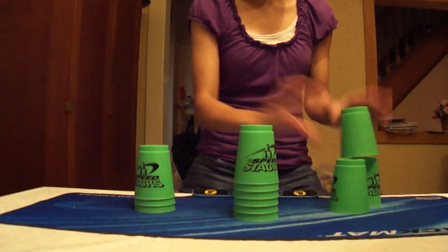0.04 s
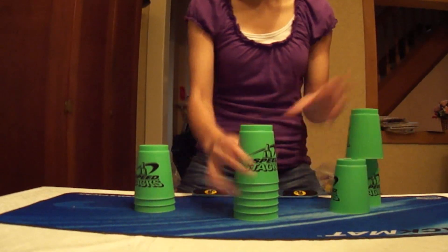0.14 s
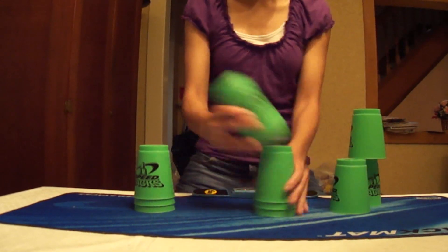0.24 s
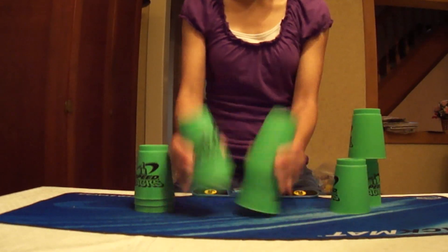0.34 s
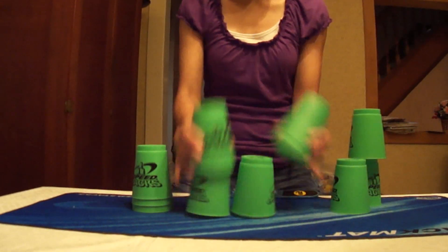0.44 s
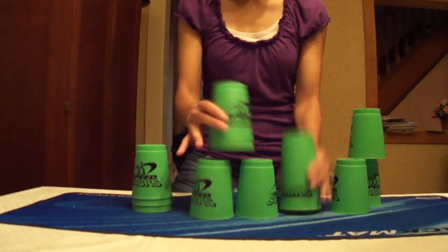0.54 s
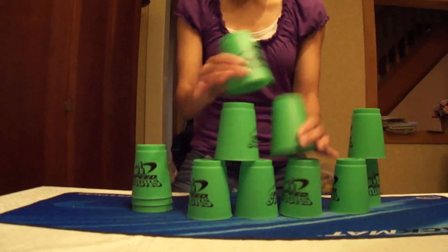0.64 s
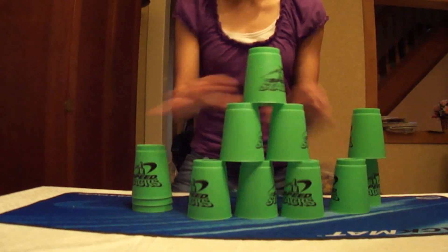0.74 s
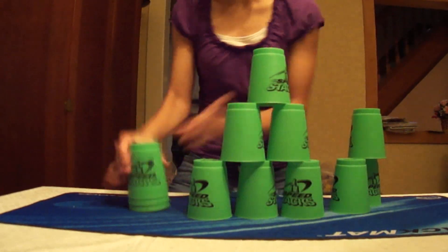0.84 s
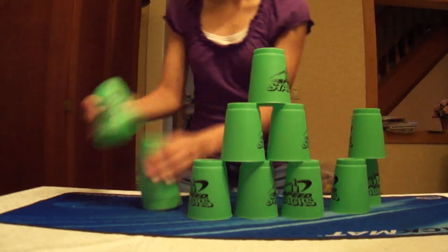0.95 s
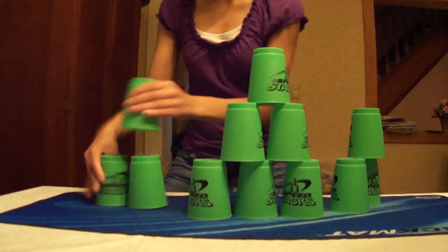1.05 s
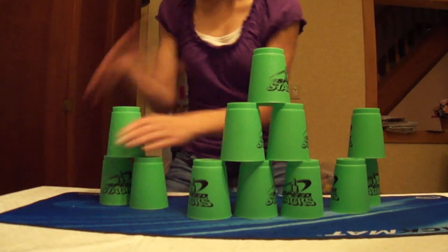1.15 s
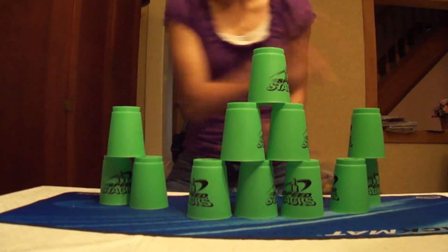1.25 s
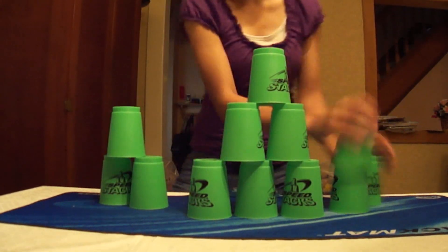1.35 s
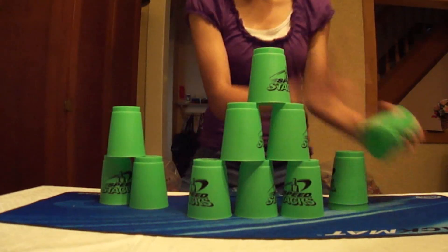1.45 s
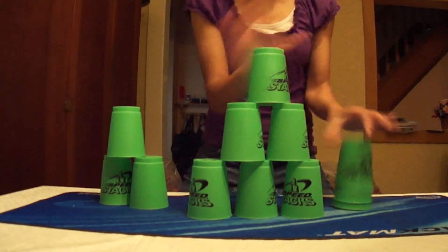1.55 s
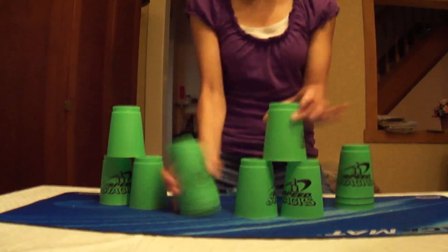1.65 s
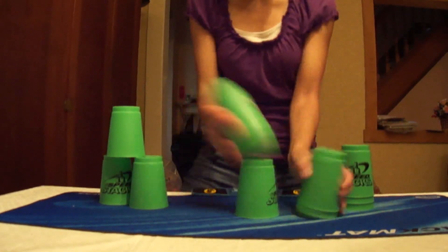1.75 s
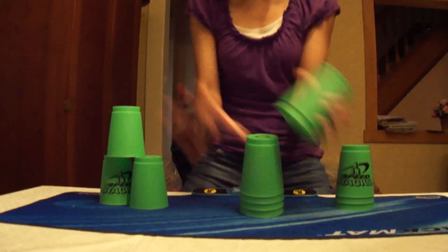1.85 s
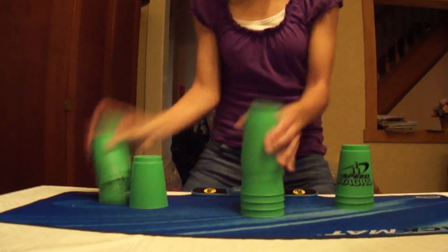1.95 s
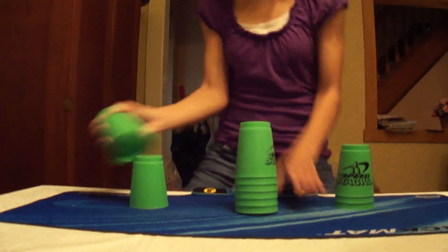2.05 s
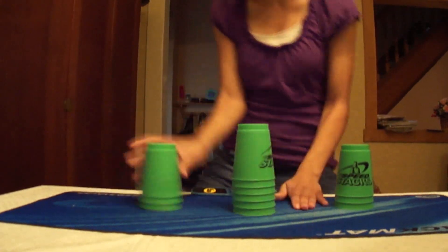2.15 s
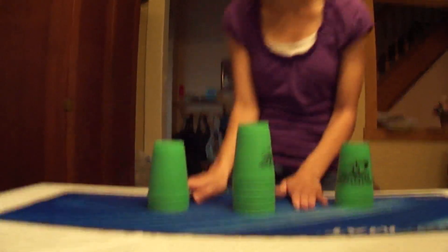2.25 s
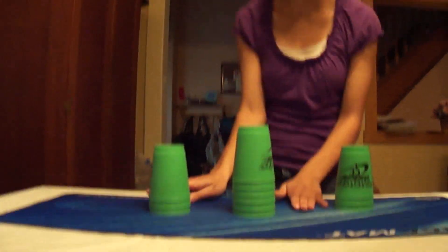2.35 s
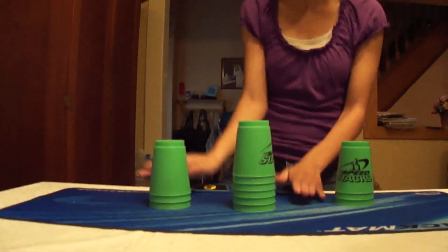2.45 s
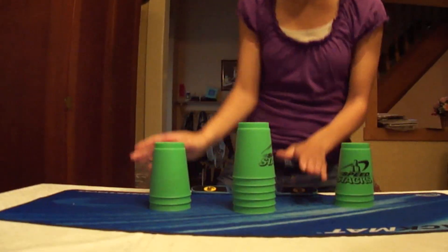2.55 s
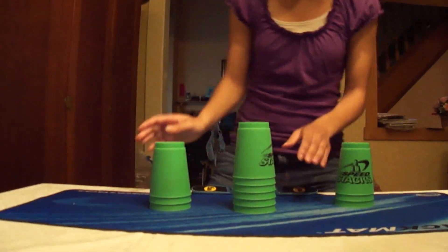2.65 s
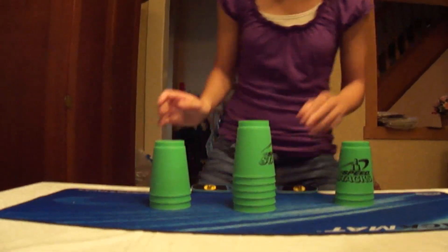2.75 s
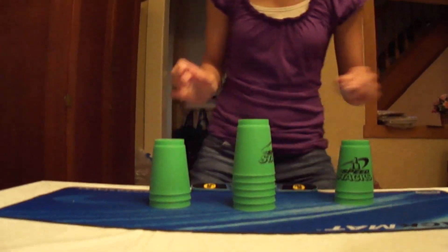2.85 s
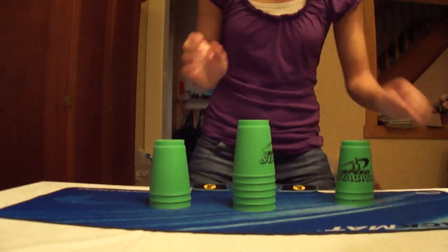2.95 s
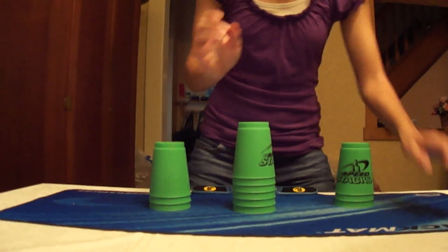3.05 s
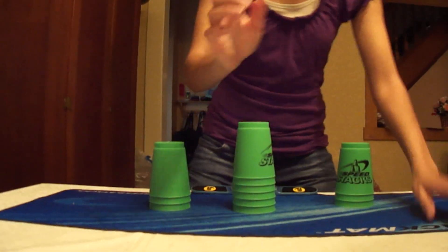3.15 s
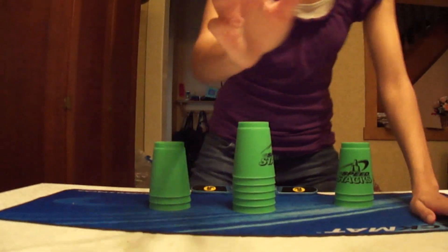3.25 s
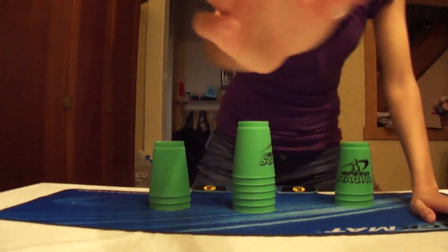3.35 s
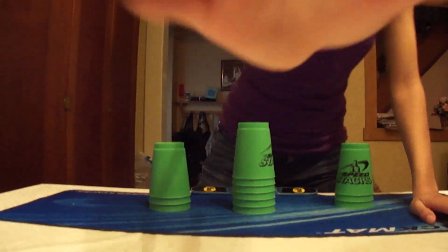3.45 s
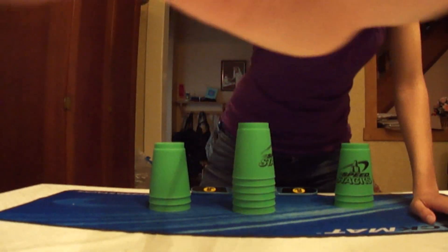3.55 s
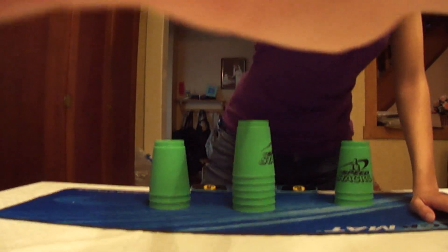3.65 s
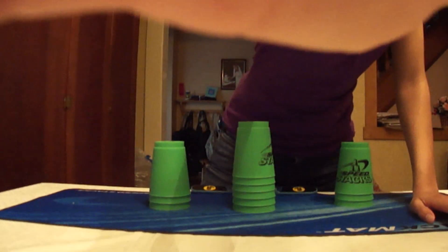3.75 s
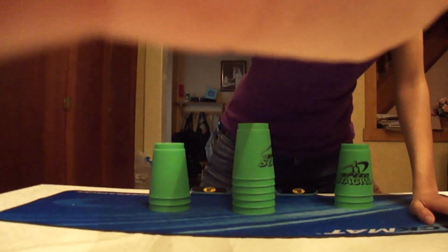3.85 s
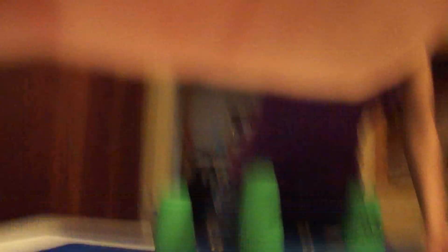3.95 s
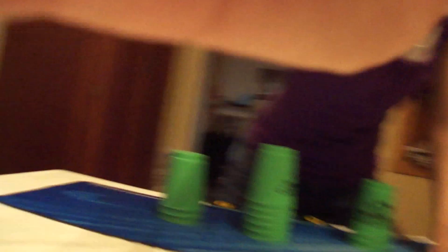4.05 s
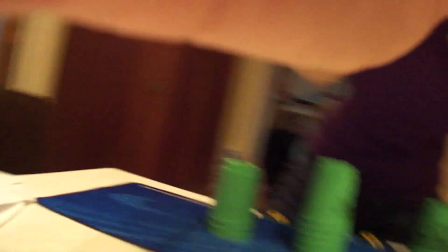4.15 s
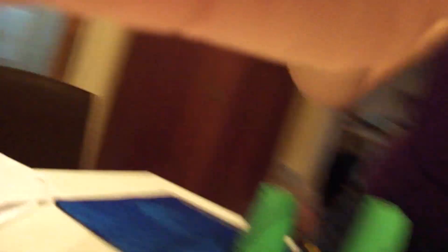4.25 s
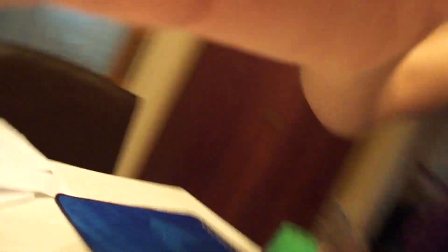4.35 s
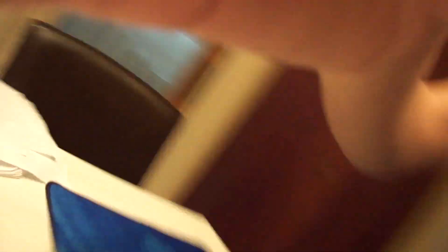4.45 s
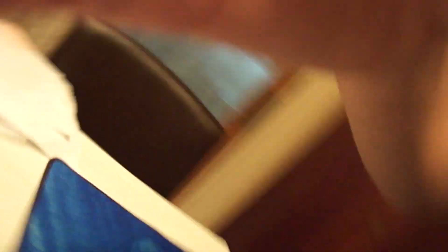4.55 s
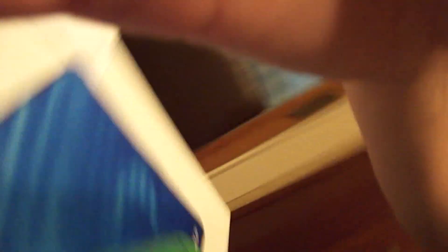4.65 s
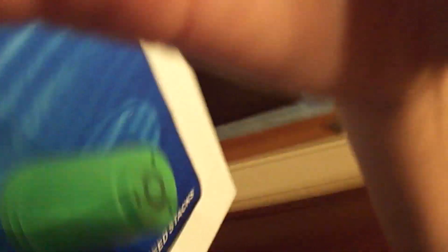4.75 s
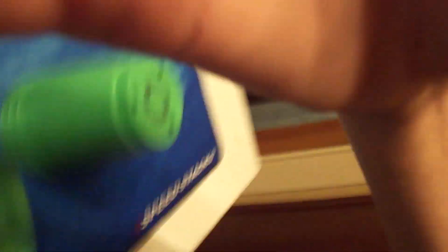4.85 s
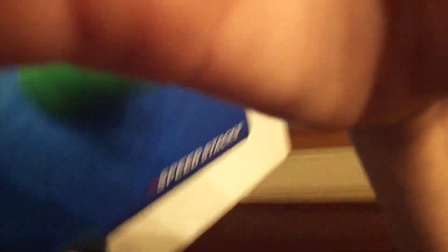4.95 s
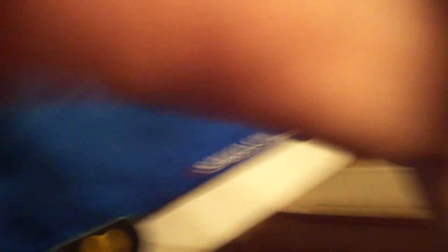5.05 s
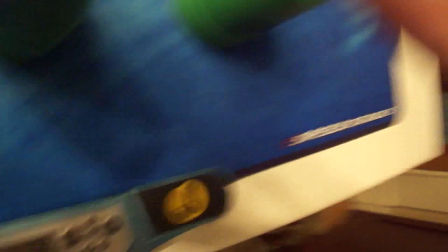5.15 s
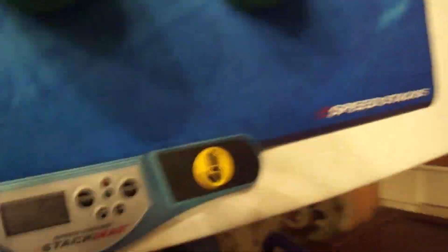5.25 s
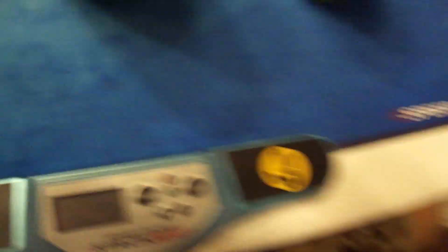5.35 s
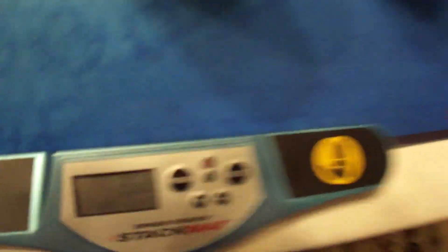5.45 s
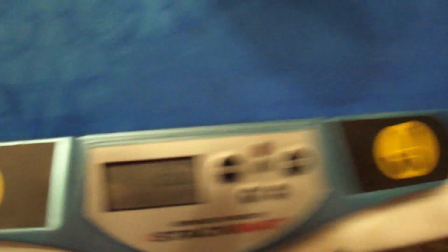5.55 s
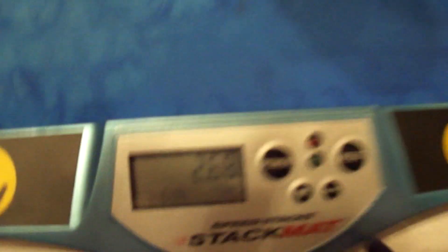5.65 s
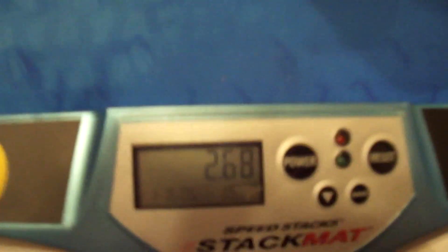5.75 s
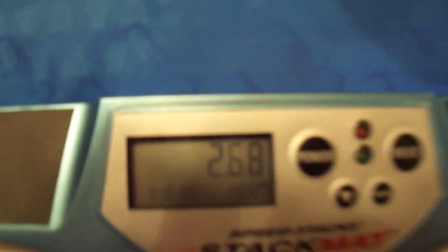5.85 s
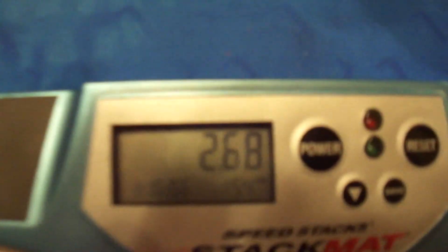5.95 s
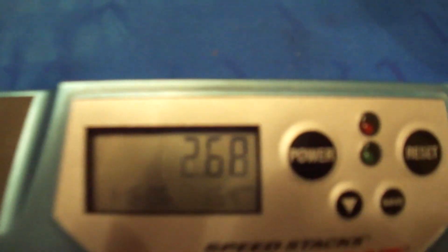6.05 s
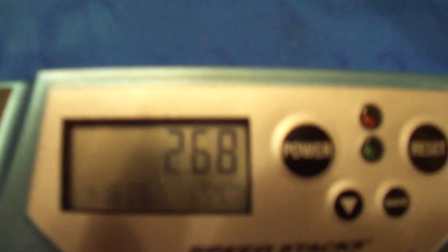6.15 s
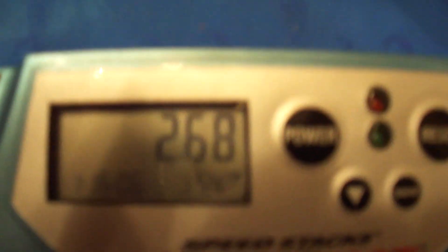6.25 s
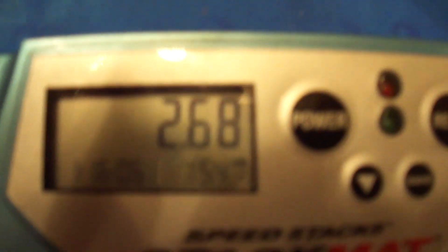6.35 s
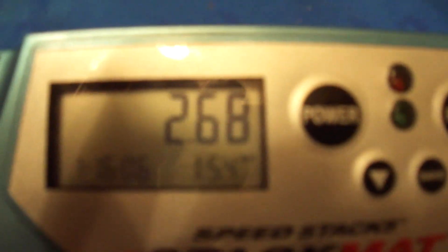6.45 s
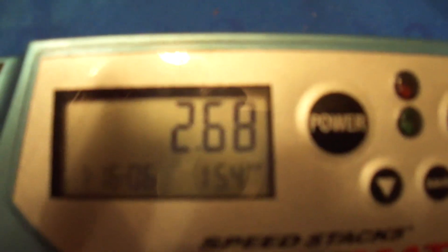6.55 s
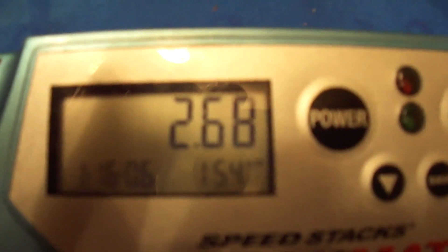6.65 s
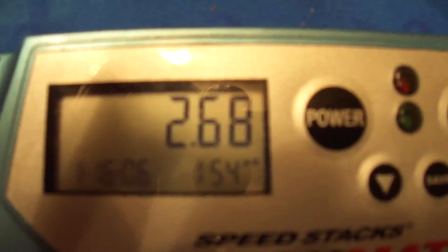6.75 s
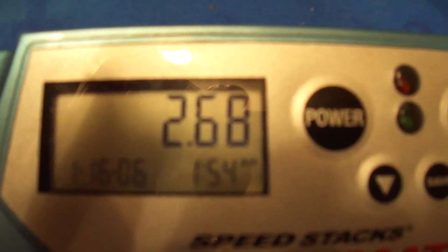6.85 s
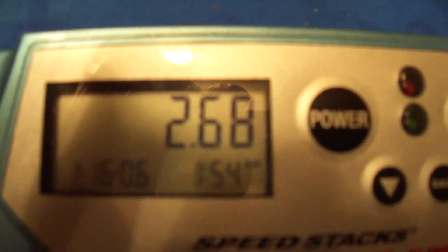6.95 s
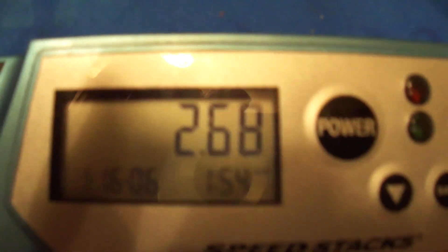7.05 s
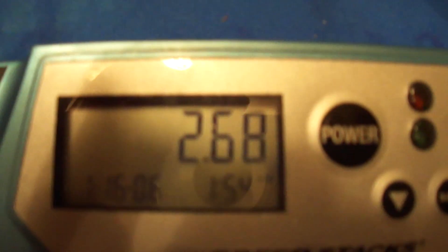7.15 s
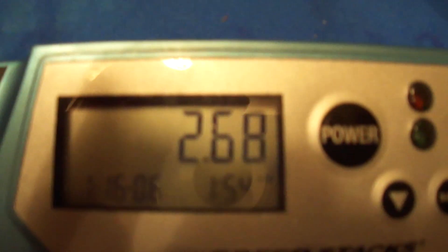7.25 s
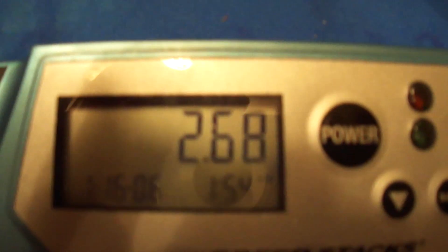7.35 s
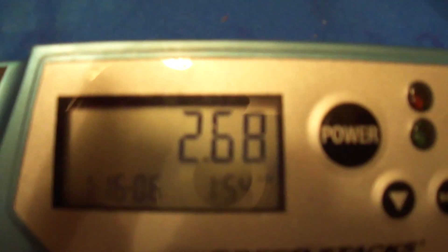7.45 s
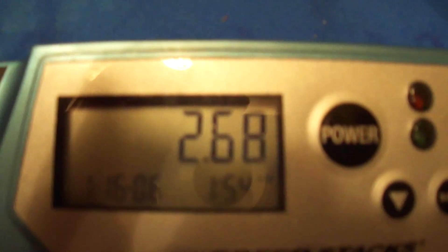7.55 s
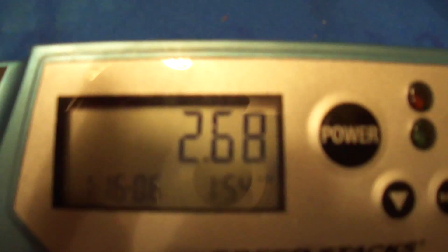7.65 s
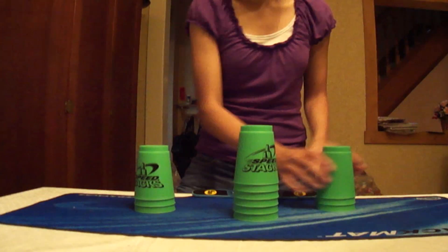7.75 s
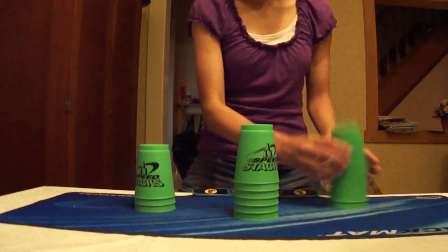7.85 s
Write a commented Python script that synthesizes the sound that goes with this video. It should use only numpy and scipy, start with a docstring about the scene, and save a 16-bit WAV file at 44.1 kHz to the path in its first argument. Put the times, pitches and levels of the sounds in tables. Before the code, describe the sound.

Rapid overloaded clacking of plastic cups in a small live room gives way to hiss, small ticks, a gripping bump, and one late click.

```python
"""Plastic cups clatter into pyramids and are swept down again at speed on a mat-covered table in a small live room.
Each blow grazes, rings the air inside a cup, cracks its shell and bounces; sliding cups scrape and rattle.
Hollow swells, grainy noise through a cup's modes, sound like the room's echo. The camera microphone overloads on
the loudest blows; close to it, the lens ticks while focusing and a hand grips the case with a bump.
Hiss, a wavering hum and a faint whine lie beneath. Last, one short block repeats as a faint buzz, then silence."""
import sys
import numpy as np
from scipy import signal
from scipy.fft import rfft, irfft
from scipy.io import wavfile

SR = 44100
rng = np.random.default_rng(int(sys.argv[2]) if len(sys.argv) > 2 else 0)


def put_to_file(sound):
    """Save the sound as 16-bit audio at rate SR, in the file named by the first command-line argument."""
    columns = np.atleast_2d(sound).T  # one column per channel
    safe = np.clip(columns, -1, 1)
    whole_steps = np.round(safe * 32767)
    wavfile.write(sys.argv[1], SR, whole_steps.astype(np.int16))


N = 348831
TIME = np.arange(N) / SR
RING = TIME[:SR // 4]  # clock of one struck sound

# cup blows: (time [s], level [dB], cavity pitch [Hz], shell crack [dB], share sent to the room [dB])
BLOWS = [(0.1183, -1, 977, -2, -15.5), (0.171, -9, 246, -3, -8.5), (0.1895, 4.5, 885, -7.5, 4),
         (0.3135, 1.5, 980, -11.5, -4.5), (0.372, -5, 856, -7.5, 2), (0.448, -3, 1313, -7.5, -0.5),
         (0.535, -14.5, 931, -15, -10.5), (0.5955, 2, 1020, -2, -5.5), (0.6215, 4.5, 608, -18, -6),
         (0.6685, -19.5, 2280, 11.5, -1), (0.7345, -0.5, 970, -12, -2.5), (0.7415, -3, 448, -5.5, 1.5),
         (0.8002, 5.5, 1055, -13, 3), (0.8783, 5, 946, -13, -11.5), (0.904, 4.5, 948, -4, -0.5),
         (1.163, -17.5, 498, 3, -7), (1.2438, 8, 604.6, -16, -0.5), (1.3165, 6, 988, -9, 2.5),
         (1.538, 5.5, 950, -5.5, -3), (1.62, 6, 1405, -12.5, -0.5), (1.712, 0, 756, 1, 4),
         (1.768, 7, 906, -15.5, -6), (1.784, 0, 1173, -19, 7.5), (1.799, -6.5, 1090, 10.5, -26.5),
         (1.823, -1.5, 1833, -6, 6.5), (1.8485, 1.5, 1310, 2, -4), (1.877, 3.5, 1011, -27.5, -2.5),
         (1.903, 3.5, 951, -6, 2.5), (1.9455, 4, 1765, -1.5, -20.5), (1.9733, 2.5, 1241, -6, 6.5),
         (2.015, 4.5, 1835, -11, -2), (2.139, 7, 876, -24, 1), (2.1563, -4, 1184, -9, -8.5),
         (2.168, 0, 1457, 2, -7.5), (2.184, -3.5, 1590, -4, 9.5), (2.2475, -2, 1277, -7.5, -11.5),
         (2.2725, 1, 962, -8, 1.5), (2.306, 4.5, 511, -30.5, -3), (2.3545, 7, 1231, -21.5, -1.5),
         (2.514, -25, 1240, 6.5, -16)]
# cups sliding on each other: (time of the middle [s], length [s], level [dB])
SLIDES = [(0.005, 0.036, -37.5), (0.137, 0.033, -27.5), (0.559, 0.013, -23.5), (0.635, 0.047, -47),
          (0.837, 0.011, -23), (1.101, 0.05, -28.5), (1.582, 0.032, -22.5), (1.802, 0.06, -23),
          (1.932, 0.022, -21), (2.154, 0.046, -23.5), (2.304, 0.013, -16), (2.428, 0.011, -29)]
# a hollow swell of room echo near 960 Hz after loud cup blows: (time of the middle [s], length [s], level [dB])
HOLLOW_SWELLS = [(0.235, 0.095, -14), (0.955, 0.089, -14), (1.35, 0.031, -15), (1.533, 0.014, -6.5)]
# soft thuds of hands and feet about the table: (time [s], level [dB], brightness [Hz])
THUDS = [(2.6, -30, 890), (2.798, -31.5, 820), (2.914, -38.5, 580), (3.385, -43, 400), (3.661, -42, 690),
         (3.791, -34.5, 694), (3.843, -36, 1210), (3.92, -35.5, 700)]
# focus ticks of the lens: (time [s], level [dB])
TICKS = [(2.1144, -11), (2.2395, -18), (2.4398, -7.5), (2.5547, -10), (2.7096, -16), (2.8613, -12.5),
         (2.977, -12), (3.094, -13.5), (3.208, -15.5), (3.2951, -13.5), (3.3932, -16.5), (3.493, -14),
         (3.6193, -12), (3.752, -10), (3.8826, -10), (4.0261, -13)]
# fingers knocking on the camera: (time [s], level [dB], centre of the colour [Hz])
KNOCKS = [(3.411, -23.5, 1700), (3.844, -20.5, 1460), (4.016, -22, 3460), (4.067, -23.5, 2960),
          (4.097, -10, 2430), (4.144, -7, 2100), (4.145, 3, 263), (4.365, -27, 2740), (4.816, -25.5, 2800),
          (4.98, -16, 1090), (5.017, -26, 1990), (5.137, -15.5, 855), (5.173, -13, 3100),
          (5.467, -26.5, 510), (5.53, -26.5, 3500), (5.593, -23.5, 7000), (5.721, -40, 920),
          (6.19, -30.5, 3520), (7.072, -3.5, 3700), (7.0735, -15, 2650), (7.228, -21.5, 990)]
# first and last slip of a tightening grip: (time [s], level [dB], centre of the colour [Hz])
GRIP_ENDS = [(4.106, -16.5, 430), (4.139, -2, 1980)]
# small springs that sing on inside the camera after a knock: (time [s], pitch [Hz], level [dB], t60 [s])
SPRINGS = [(4.142, 1106, -23.5, 0.28), (5.721, 970, -27, 0.023), (7.072, 1540, -30, 0.15),
           (7.073, 5100, -30, .055)]
# skin brushing the camera: (time of the middle [s], length [s], level [dB])
BRUSHES = [(4.128, 0.051, -40), (4.62, .1, -55), (4.69, 0.059, -38.5), (5.24, 0.053, -42.5)]

# modes of a cup: (multiple of the cavity pitch, level [dB], t60 at the open pitch [s])
CUP_MODES = [(1, -2.5, 0.026), (.98, -18, 0.15), (.76, -12.5, 0.031), (1.34, -8.5, .02), (.45, -22, 0.047),
             (1.95, -8, 0.0026), (2.5, -32.5, 0.038)]
# modes of the table top: (frequency [Hz], level [dB], t60 [s])
TABLE_MODES = [(125, -54.5, .14), (285, -25.5, 0.049), (376, -44.5, 0.18), (470, -17.5, 0.037)]
# modes of the lens barrel: (frequency [Hz], level [dB], t60 [s])
LENS_MODES = [(555, -19.5, 0.028), (1250, -20, 0.04), (2680, -13, 0.017), (5280, -6, 0.0049),
              (6040, -5.5, 0.0017), (9270, 5, 0.004), (10640, -5.5, 0.0044)]
# modes of the camera body: (frequency [Hz], level [dB], t60 [s])
BODY_MODES = [(218, -12, 0.06), (450, -1, 0.028), (674, -8.5, 0.039), (900, 0, 0.016), (1298, 1, 0.018),
              (2410, 6, 0.005), (2876, -0.5, 0.021), (3890, 2, 0.004), (5330, 7, 0.0038),
              (7150, 4.5, 0.0018), (9350, 2, 0.0046)]

# spectrum of a cracking cup wall: (frequency [Hz], level [dB])
SHELL_SPECTRUM = [(60, -37), (300, -27), (1200, 12), (2200, 17), (3200, 9.5), (5200, 9.5), (7000, 3.5),
                  (11000, -1), (14000, -31)]
# spectrum of scraping and grit: (frequency [Hz], level [dB])
SCRAPE_SPECTRUM = [(100, -41.5), (500, 11.5), (1500, 4), (3300, 10.5), (5500, 8.5), (8000, 6), (11000, 3),
                   (14000, -52)]
# spectrum of the microphone hiss: (frequency [Hz], level [dB])
HISS_SPECTRUM = [(18, -64), (30, -51), (91, -17), (120, -8), (187, -8), (216, -6), (306, -6), (466, -5.5),
                 (1640, -9.5), (1770, -10), (2000, -12), (4200, -17.5), (5110, -20), (11000, -22.5),
                 (14300, -55), (22000, -120)]
# steady hum before its swell: (frequency [Hz], rms level [dB])
HUM = [(220.5, -56.5), (1319, -83)]
# the hum grows as the camera is moved: (time [s], level [dB])
HUM_SWELL = [(4.9, -4), (7.3, 3.5)]
# a faint high whine while the camera is carried, before its flutter: (time [s], level [dB])
WHINE = [(4.3, -72), (4.9, -60), (5.4, -59), (7.0, -69), (7.25, -76)]
# reverberation of the room: (frequency [Hz], t60 [s])
ROOM_T60 = [(80, 0.89), (180, 1.57), (380, 0.59), (900, 0.36), (1400, 0.52), (3000, 0.57), (9000, 0.68)]

HISS_DB = -47.5  # rms
# a rim grazes just before it seats
GRAZE_S, GRAZE_DB = 0.0035, -25.5
# after a blow the cup bounces, on average sooner each time, and always weaker
BOUNCE_S, BOUNCE_SHRINK, BOUNCE_DB = 0.018, 0.85, -16.5
# sliding cups also rattle: light knocks at random pitches, as loud as the slide plus RATTLE_DB
RATTLES_PER_S, RATTLE_DB, RATTLE_SPREAD_DB = 45, 9, 8
RATTLE_HZ, RATTLE_OCTAVES, RATTLE_CRACK_DB, RATTLE_ROOM_DB = 703, 0.6, -3.5, 3
# the higher a cup's pitch, the sooner it dies: t60 goes with (open pitch / pitch) ** DAMPING_POWER
OPEN_CUP_HZ, DAMPING_POWER = 962, 0.53
GRIP_JITTER_S = 0.0022
WHINE_HZ, WHINE_WIDTH_HZ = 5100, 510
STALL_S, STOP_S = 7.28, 7.79
TOP_HZ = 11100  # upper limit of the camera's sound


def undb(db):
    """Decibels to gain."""
    return 10 ** (np.asarray(db) / 20)


def add(track, s, sound):
    """Mix a sound into a track at time s."""
    start = max(int(s * SR), 0)
    track[start:start + len(sound)] += sound[:N - start]


def fade(t, t60):
    """Exponential decay by 60 dB in t60."""
    return np.exp(-np.log(1000) * t / t60)


def on_log_axis(hz, points):
    """Read (frequency [Hz], value) points along a log-frequency axis."""
    at, value = np.transpose(points)
    return np.interp(np.log(hz + 1), np.log(at), value)


def colour(x, points):
    """Give a signal a spectrum and an rms of 1."""
    gain = undb(on_log_axis(np.fft.rfftfreq(len(x), 1 / SR), points))
    y = irfft(rfft(x) * gain, len(x))
    return y / y.std()


def high_pass(x, hz):
    """Gentle bass cut."""
    return signal.sosfilt(signal.butter(2, hz, "high", fs=SR, output="sos"), x)


def ring(modes, scale=1, scatter=0, bend=0, settle_s=0.0057):
    """Struck modes die away; all but the first are detuned at random, and the pitch may start off by the share bend."""
    hz, db, t60 = np.transpose(modes)[:, :, None]
    index = np.arange(len(hz))[:, None]
    detune = scatter * rng.standard_normal(hz.shape) * (index > 0)
    polarity = (-1) ** index
    # a clock that runs fast or slow at first bends the pitch
    clock = RING + bend * settle_s * (1 - np.exp(-RING / settle_s))
    waves = np.sin(2 * np.pi * hz * scale * (1 + detune) * clock)
    return np.sum(polarity * undb(db) * fade(RING, t60) * waves, axis=0)


def hiss():
    """Microphone hiss: steady noise with a fixed spectrum."""
    return undb(HISS_DB) * colour(rng.standard_normal(N), HISS_SPECTRUM)


def hum(waver_rad=0.3):
    """Faint steady tones whose phase wavers slowly and whose level swells."""
    tones = 0
    for hz, db in HUM:
        drift = colour(rng.standard_normal(N), [(3, 0), (15, -20), (60, -80), (200, -140)])
        wave = np.sqrt(2) * np.sin(2 * np.pi * hz * TIME + waver_rad * drift)
        tones = tones + undb(db) * wave
    return tones * undb(np.interp(TIME, *np.transpose(HUM_SWELL)))


def friction(strokes, grain_db, catch_db=4):
    """Grainy noise of dense uneven micro-slips that swells and dies away, its level catching every few milliseconds."""
    swell = sum(undb(db) * np.exp(-2 * ((TIME - s) / length) ** 2) for s, length, db in strokes)
    slips = np.repeat(grain_db * rng.standard_normal(N // 32 + 1), 32)[:N]
    catches = np.repeat(catch_db * rng.uniform(-1, 1, N // 160 + 1), 160)[:N]
    grains = rng.standard_normal(N) * undb(slips + catches)
    return swell * colour(grains, SCRAPE_SPECTRUM)


def rattles():
    """Light knocks scattered through each slide, as rows like those of the blows."""
    rows = []
    for s, length, db in SLIDES:
        count = int(2 * length * RATTLES_PER_S)
        for when, size, pitch in rng.standard_normal((12, 3))[:count]:
            time = s + length * when / 2
            level = db + RATTLE_DB + RATTLE_SPREAD_DB * size
            hz = RATTLE_HZ * 2 ** (RATTLE_OCTAVES * pitch)
            rows.append((time, level, hz, RATTLE_CRACK_DB, RATTLE_ROOM_DB))
    return rows


def blow(db, hz, shell_db, body_db=2.12, crack_db=-2.5, crack_t60=0.013, buzz_db=-25, buzz_t60=0.13):
    """One blow rings cavity and table and cracks the shell."""
    damping = (OPEN_CUP_HZ / hz) ** DAMPING_POWER
    modes = [(multiple, mode_db, t60 * damping) for multiple, mode_db, t60 in CUP_MODES]
    # the cups are still moving, so the trapped air changes pitch as it rings
    cavity = ring(modes, hz, scatter=0.06, bend=0.12 * rng.uniform(-1.05, 1))
    hollow = undb(db + body_db) * (cavity + ring(TABLE_MODES, scatter=0.091))
    # a hard first contact, then the thin wall buzzes on
    contact = fade(RING, crack_t60) + undb(buzz_db) * fade(RING, buzz_t60)
    shell = colour(rng.standard_normal(len(RING)), SHELL_SPECTRUM)
    crack = undb(db + crack_db + shell_db) * contact * shell
    return hollow, crack


def cups(crack_room_db=-2.0, bounces=2):
    """Blows and rattles, each grazing and bouncing; returns the direct sound and what the room receives."""
    direct, spread = np.zeros(N), np.zeros(N)
    for s, db, hz, shell_db, room_db in BLOWS + rattles():
        hollow, crack = blow(db, hz, shell_db)
        add(direct, s - GRAZE_S, undb(GRAZE_DB) * (hollow + crack))
        # k = 0 is the blow itself
        for k, chance in enumerate(rng.uniform(0.5, 1, bounces + 1)):
            add(direct, s, undb(k * BOUNCE_DB) * (hollow + crack))
            to_room = hollow + undb(crack_room_db) * crack
            add(spread, s, undb(k * BOUNCE_DB + room_db) * to_room)
            s = s + BOUNCE_S * BOUNCE_SHRINK ** k * chance
    return direct, spread


def room(x, wet_db=-4.57, build_s=0.0014, treble_db=-3, first_s=0.0072):
    """Wall echoes set in after a few milliseconds, thicken and die away, each octave at its own rate."""
    t = TIME[:SR]
    noise, hz = rfft(rng.standard_normal(SR)), np.arange(SR // 2 + 1)
    octave = np.log2(np.clip(hz, 80, 80 * 2 ** 7) / 80)
    tail = 0
    for k in range(8):
        centre = 80 * 2 ** k
        band = irfft(noise * np.maximum(1 - abs(octave - k), 0), SR)
        level_db = on_log_axis(centre, [(1500, 0.015), (5000, treble_db)])
        tail = tail + band * fade(t, on_log_axis(centre, ROOM_T60)) * undb(level_db)
    tail = tail * (1 - np.exp(-np.maximum(t - first_s, 0) / build_s))
    return undb(wet_db) * signal.fftconvolve(x, tail / np.linalg.norm(tail))[:N]


def hollow_swells(longest_t60=0.045):
    """Grainy noise rings through the cup's modes as a hollow swell, like the room's echo of loud blows."""
    modes = [(multiple, db, min(t60, longest_t60)) for multiple, db, t60 in CUP_MODES]
    cavity = ring(modes, OPEN_CUP_HZ, scatter=0.027)
    noise = friction(HOLLOW_SWELLS, grain_db=1, catch_db=2)
    return signal.fftconvolve(noise, cavity / np.linalg.norm(cavity))[:N]


def lens(tick_db=1, lead_s=0.0047, lead_db=-20, case_db=-24, grit_db=-27, grit_t60=0.048):
    """The focus drive takes up its slack, then snaps one step, which jolts the camera body."""
    out = np.zeros(N)
    for s, db in TICKS:
        slack = ring(LENS_MODES, scatter=0.081)
        add(out, s - lead_s, undb(db + lead_db) * slack)
        snap = ring(LENS_MODES, bend=0.041 * rng.standard_normal(), scatter=0.021)
        add(out, s, undb(db + tick_db) * snap)
        grit = colour(rng.standard_normal(len(RING)), SCRAPE_SPECTRUM) * fade(RING, grit_t60)
        jolt = ring(BODY_MODES, scatter=0.047)
        add(out, s, undb(db) * (undb(case_db) * jolt + undb(grit_db) * grit))
    return out


def thuds(t60=0.067, bass_db=-9, hold_s=0.036):
    """Padded blows: short bursts that hold while hand or foot settles and fall away steeply above their brightness."""
    out = np.zeros(N)
    for s, db, hz in THUDS:
        shape = [(35, -30), (75, bass_db), (hz / 2, -5), (hz, 0), (2 * hz, -17), (5 * hz, -32), (20000, -50)]
        burst = colour(rng.standard_normal(len(RING)), shape)
        add(out, s, undb(db) * burst * fade(np.maximum(RING - hold_s, 0), t60))
    return high_pass(out, hz=55.4)


def handling(slope_db=6, grit_db=-13, grit_t60=0.011):
    """Knocks ring the camera body, strongest in the modes near their colour; springs sing on and skin brushes."""
    out = friction(BRUSHES, grain_db=4.5)
    for s, db, centre in KNOCKS + grip():
        # modes weaken by slope_db per octave away from the centre
        modes = [(hz, mode_db - slope_db * abs(np.log2(hz / centre)), t60) for hz, mode_db, t60 in BODY_MODES]
        knock = ring(modes, scatter=0.063)
        shape = [(centre / 4, -10), (centre, 0), (4 * centre, -14)]
        grit = colour(rng.standard_normal(len(RING)), shape) * fade(RING, grit_t60)
        add(out, s, undb(db) * (knock / abs(knock).max() + undb(grit_db) * grit))
    for s, hz, db, t60 in SPRINGS:
        add(out, s, ring([(hz, db, t60)]))
    return out


def grip(count=8):
    """A tightening hand slips in quick uneven steps, ever louder and brighter; rows like those of the knocks."""
    slips = np.linspace(*GRIP_ENDS, count)
    return [(s + GRIP_JITTER_S * rng.standard_normal(), db, hz) for s, db, hz in slips]


def whine(flutter_db=3, flutter_hz=14):
    """A narrow high resonance, noise passed by one peak, whose level flutters."""
    hz = np.fft.rfftfreq(N, 1 / SR)
    peak = 1 / (1 + (2 * (hz - WHINE_HZ) / WHINE_WIDTH_HZ) ** 2)
    band = irfft(rfft(rng.standard_normal(N)) * peak, N)
    flutter = colour(rng.standard_normal(N), [(flutter_hz, 0), (10 * flutter_hz, -60)])
    level_db = np.interp(TIME, *np.transpose(WHINE), left=-np.inf, right=-np.inf)
    return band / band.std() * undb(level_db + flutter_db * flutter)


def scene(slide_room_db=-7, swell_room_db=-1, swell_direct_db=-3, thud_direct_db=-3, low_cut_hz=120):
    """Cups and thuds sound in the room; the camera's own noises reach the microphone through its case."""
    direct, spread = cups()
    slides, swells, soft = friction(SLIDES, grain_db=4.5), hollow_swells(), thuds()
    ringing = high_pass(spread + undb(swell_room_db) * swells, hz=105)
    echoes = room(ringing + undb(slide_room_db) * slides + soft)
    # the small microphone passes little of the knocks' deep bass
    near = high_pass(direct + slides + undb(swell_direct_db) * swells + lens() + handling(), low_cut_hz)
    background = hiss() + hum() + whine()
    return (near + undb(thud_direct_db) * soft + echoes + background)[None]


def record(dry):
    """The camera flattens loud peaks and cuts the top; at the end it repeats one block as a faint buzz and stops."""
    out = np.clip(dry[0], -1, 1)
    block = 2048  # samples
    stall = int(STALL_S * SR)
    buzz = np.resize(out[stall:stall + block], N - stall)
    out = np.concatenate([out[:stall], buzz]) * (TIME < STOP_S)
    top_cut = signal.ellip(10, 0.2, 70, TOP_HZ, fs=SR, output="sos")
    return signal.sosfilt(top_cut, out)[None]


dry = scene()
out = record(dry)
put_to_file(out)
```